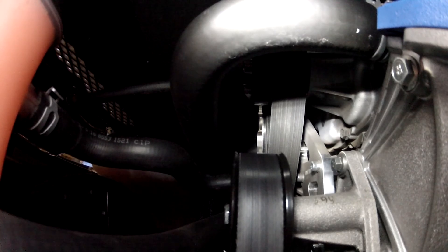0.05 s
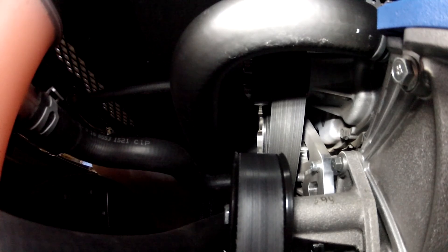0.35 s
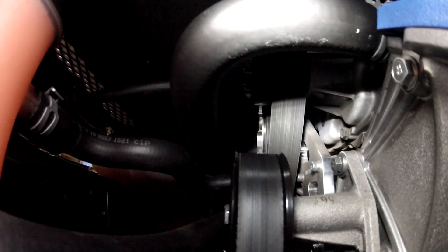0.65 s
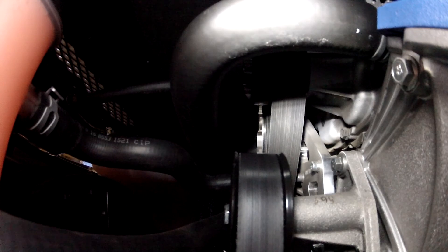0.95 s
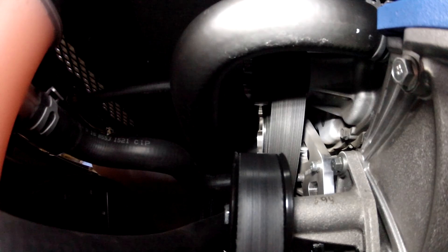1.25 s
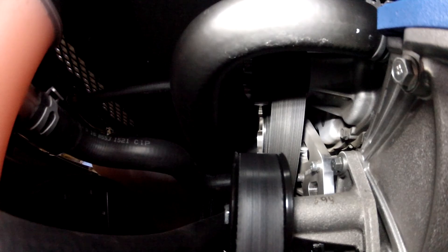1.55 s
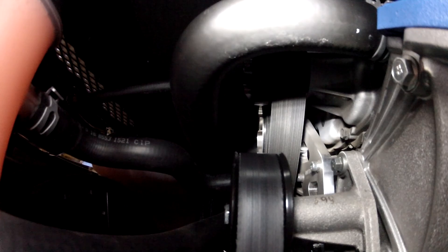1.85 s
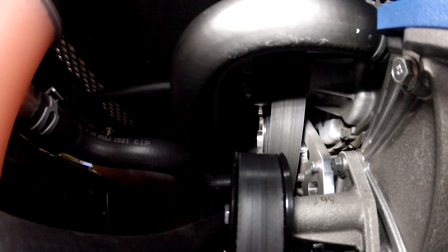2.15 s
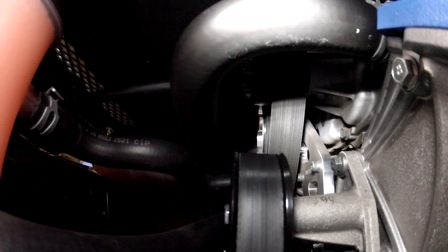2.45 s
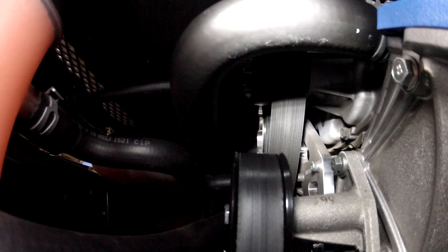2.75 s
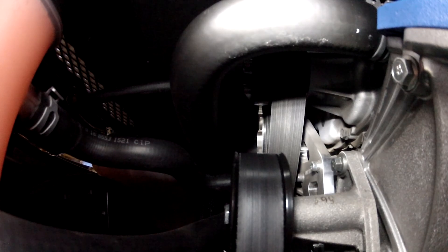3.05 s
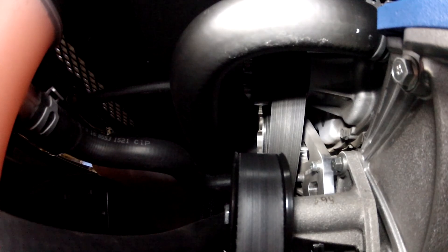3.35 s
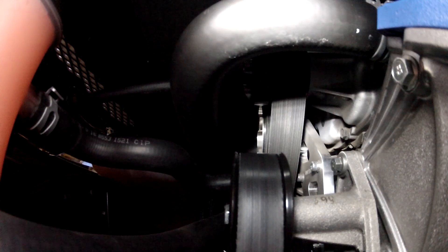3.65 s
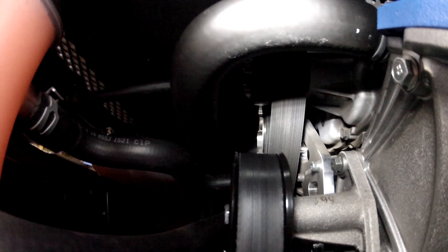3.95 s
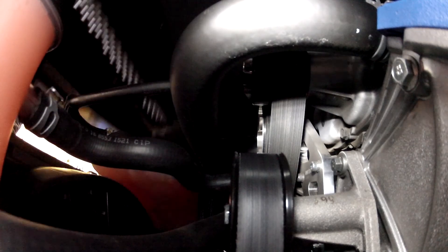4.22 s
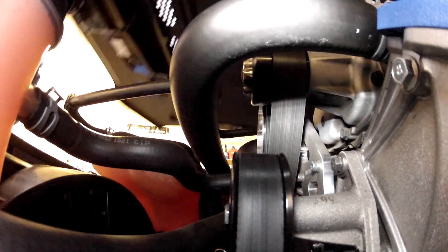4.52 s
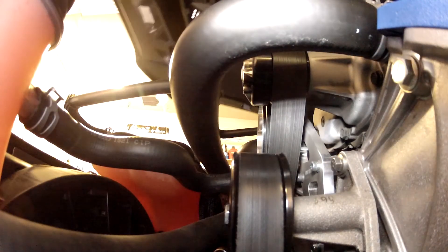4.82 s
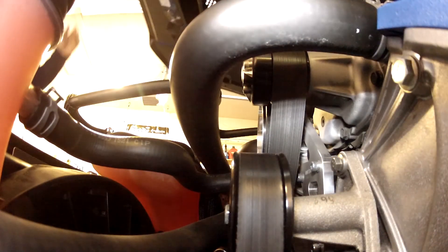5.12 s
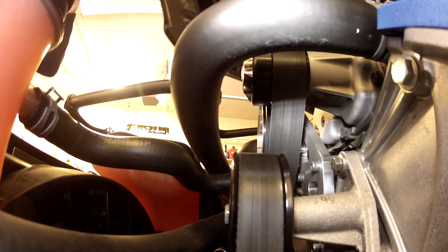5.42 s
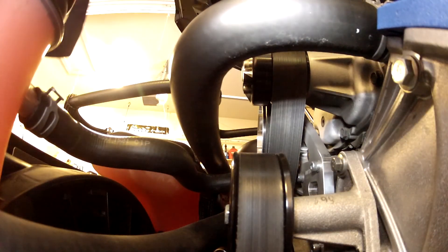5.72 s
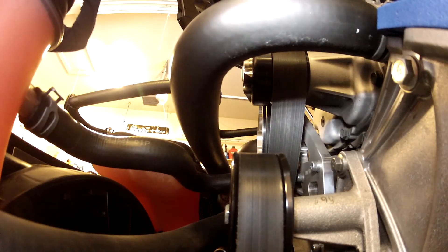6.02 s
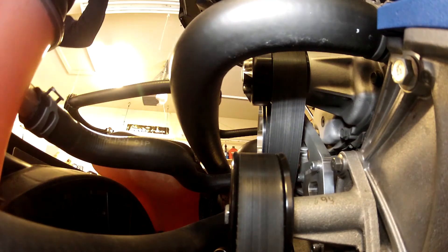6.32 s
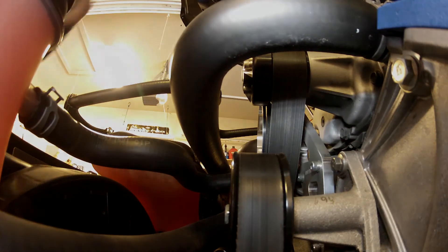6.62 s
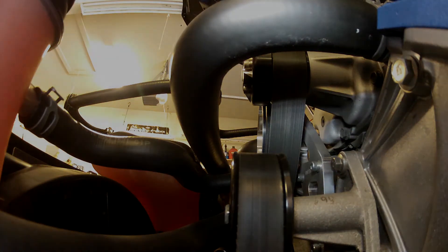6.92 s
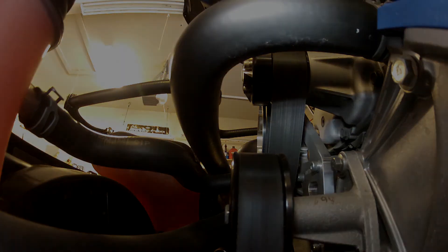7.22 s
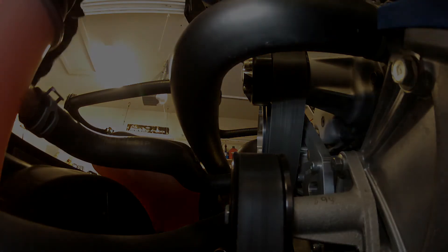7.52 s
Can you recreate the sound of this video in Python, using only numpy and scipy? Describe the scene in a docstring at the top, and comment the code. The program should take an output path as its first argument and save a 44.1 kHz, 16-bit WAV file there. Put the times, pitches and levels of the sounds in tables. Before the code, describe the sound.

A car door slams with a heavy, booming thump, heard from inside the engine bay in a garage. A cooling fan coasts down with a faint, falling whine as dull footsteps come round. The hood latch thuds free and the safety catch snaps loudly, ringing the metal. The hood lifts on faintly hissing struts, with a few knocks over low room rumble and hum.

```python
"""Inside a car's engine bay, in a garage: a door slams and a rotor, likely the cooling fan, coasts down.
Dull footsteps come round to the front, the latch thuds free and the safety catch snaps, ringing the hood.
The hood lifts on hissing gas struts, and the rush of the shut bay gives way to garage rumble and hum.
The loud blows overload a converter that holds each sample, which adds a fizz near 12 kHz."""
import sys
import numpy as np
from scipy import signal
from scipy.io import wavfile
from scipy.ndimage import uniform_filter1d

SR = 44100
rng = np.random.default_rng(int(sys.argv[2]) if len(sys.argv) > 2 else 0)


def int16_out(signal):
    """Quantize to a 16-bit WAV file."""
    q = np.round(np.clip(np.atleast_2d(signal).T, -1, 1) * 32767)
    wavfile.write(sys.argv[1], SR, q.astype(np.int16))


N = 342657
TIME = np.arange(N) / SR
AGE = TIME[:2 * SR]  # seconds since a hit

# The door landing and shuddering: start_s, level_db
DOOR_BLOWS = [(.046, 0), (.07, -.5), (.081, -2.5), (.124, -4.5), (.195, -17)]
# Tone of the door's blows and of its rubbing seal: freq_hz, level_db
DOOR_COLOUR = [(24, -27), (40, 0.5), (146, -3.5), (204, -9), (277, -4.5), (355, -13), (394, -19.5),
               (547, -14), (659, -27.5), (716, -23.5), (1100, -45), (1670, -57), (2840, -55), (5500, -73),
               (7150, -102), (12100, -120)]
SEAL_COLOUR = [(59, -39.5), (100, -12), (389, 1), (840, 0.5), (1020, -18.5), (1350, -33), (1930, -52.5),
               (2100, -31.5), (2960, -43), (5000, -43.5), (6500, -84), (11000, -120)]
# Ring of the car body, the hood and the latch: pitch_hz, level_db, t60_s
BODY_MODES = [(53.23, -19, 1.5), (75, -25, 1.6), (134.2, -20, 0.89), (276, -21.5, 0.65)]
HOOD_MODES = [(672, -4.5, .065), (430, -15, .09), (285, -17, .06), (1050, -12, .035), (1650, -27, .04),
              (135, -34, .4), (248, -30, .5), (323, -29, .6), (463, -36, .8), (506, -33, .55),
              (705, -35, .8), (1000, -46, 1.3), (1275, -55, 1.3), (1443, -60, 1.4), (1852, -57, 1.1),
              (2126, -52.5, 1.1), (2160, -55, 1.25), (2929, -49, .75), (2960, -57, .6)]
LATCH_MODES = [(32.2, -26, 0.32), (60, -25, .4), (170, -1, 0.07), (258.7, 0, 0.04), (288, -19.5, .12),
               (415.4, -28, 0.058), (470, -4, 0.065)]
# Tone of the catch's crack, the latch's thud and any hard contact: freq_hz, level_db
CATCH_COLOUR = [(35, -60), (60, -51), (139, -6.5), (208, -10), (238, 0), (422, 2), (619, -15.5), (681, -4),
                (873, -27), (1020, -24.5), (1330, -40), (2150, -18), (2360, -35.5), (2860, -30),
                (5800, -65.5), (7540, -78.5), (12800, -120)]
LATCH_COLOUR = [(15, -29), (25, -6), (61, -9), (87, -16.5), (108, -5), (138, -9.5), (172, 5.5), (215, -7.5),
                (521, -3.5), (569, -15.5), (830, -27), (1130, -47), (5000, -74.5), (6500, -99),
                (11000, -120)]
TICK_COLOUR = [(500, -19), (1000, 1.5), (1500, -8.5), (2300, -3.5), (3300, -6), (5500, -18)]
# Hands, latch and hinges knocking the hood: start_s, level_db, pitch_hz, t60_s, tick_db, rattle_db
HOOD_KNOCKS = [(3.072, -42.5, 894, 0.13, -12, 6.5), (3.357, -33.5, 488, 0.21, -16.5, -3.5),
               (3.863, -26.5, 608, .14, -18, 0), (4.164, -36, 559, 0.17, -38, -6),
               (5.481, -25.5, 386.7, 0.17, -50, -10), (5.712, -30.5, 35, 0.27, -23.5, 2),
               (5.724, -28, 622.6, 0.15, -15, -5), (5.737, -23, 326, 0.2, -42, -8),
               (7.345, -56, 700, .06, -6.5, -3), (7.64, -42.5, 617, 0.068, -7.5, -2),
               (7.7, -56, 610, .06, -6, -4)]
# Creaks of the hood: start_s, level_db
HOOD_CREAKS = [(3.27, -64), (3.56, -64.5), (6.925, -67)]
# Resonances of the bay that shape the rotor's whine: freq_hz, gain_db
BAY_RESONANCES = [(25, -22), (45, -10), (52, 1), (66, -10), (112, -4), (175, -10), (212, -12), (232, 1),
                  (248, 0), (272, -3), (295, -7), (326, -2), (365, -1), (395, -9), (450, -19), (700, -20),
                  (900, -34)]
# Footfalls: start_s, level_db, centre_hz, t60_s
FOOTFALLS = [(0.744, -39.5, 300, .26), (1.182, -31, 145, .086), (1.767, -36.5, 293, .2),
             (2.029, -33.5, 215, 0.062), (2.203, -31, 260, 0.14), (2.636, -40.5, 250, 0.15),
             (3.045, -34, 149, 0.074), (3.535, -36, 120, .22), (6.436, -45, 214, 0.12),
             (6.953, -40, 269, .32)]
# Tone of the struts' hiss: freq_hz, level_db
STRUT_COLOUR = [(300, -9.5), (550, 8), (750, 7), (1000, 0), (1400, -30), (2300, -7.5), (2950, 2),
                (3600, -2), (4300, -12.5), (5500, -23.5)]
# Tone of the shut bay's rush, its thin hiss and the open garage air: freq_hz, level_db
BAY_RUSH_COLOUR = [(15, -37.5), (25, -14), (70, 2), (118, -1), (151, -7.5), (244, -6), (293, -9),
                   (344, -7.5), (422, -24), (462, -15), (746, -12), (817, -24.5), (1290, -36),
                   (2730, -36.5), (5800, -43), (7540, -84), (12800, -120)]
BAY_HISS_COLOUR = [(2000, -35), (2550, -12), (2750, -2.5), (2950, -16), (3300, -18), (3550, -8.5),
                   (3900, -33)]
GARAGE_AIR_COLOUR = [(15, -50.5), (25, -19.5), (54, -5), (92, -7.5), (123, -4.5), (173, -10.5), (213, -9),
                     (239, -20), (286, -1), (328, -13), (484, -9), (681, -20.5), (1180, -37), (4120, -42.5),
                     (5800, -45.5), (7540, -86), (12800, -120)]
# Hum in the garage: pitch_hz, level_db
HUM_TONES = [(118.4, -60), (290.7, -65.5)]
# Reverb time of the garage: freq_hz, t60_s
GARAGE_DECAY = [(50, 0.86), (250, 0.57), (700, 0.66), (3000, 0.61), (5500, 0.51)]
# Where loud blows clip, left row then right: ceiling_amplitude
CLIP_CEILINGS = [
    [1],
    [.95],
]

LATCH_AT_S, CATCH_AT_S = 3.9365, 4.4238
LIFT_AT_S, LIFT_S = 4.1, 1.7
HOOD_OPENING = np.clip((TIME - LIFT_AT_S) / LIFT_S, 0, 1)  # 0 shut, 1 up
STRUT_ATTACK_S, STRUT_HOLD_S = .26, 1.02
START_TURNS_PER_S = 59


def door_slam(first_t60_s=.1, loosening=1.7, seal_swell_s=.041):
    """The seal rubs, the door lands, later shudders ring longer; the body booms and loose trim rattles."""
    lands = DOOR_BLOWS[0][0]
    blows = np.zeros(N)
    for start, db in DOOR_BLOWS:
        t60 = first_t60_s + loosening * (start - lands)
        blows += placed(start, gain_of(db) * rattle(DOOR_COLOUR, t60, rise=.00098))
    rub = envelope(lands - seal_swell_s, seal_swell_s, hold=0, t60=.052)
    seal = gain_of(-14.5) * rub * hiss(SEAL_COLOUR)
    trim = gain_of(-43) * rattle(TICK_COLOUR, t60=.55, rise=.0075)
    boom = ring(BODY_MODES, rise=.015)
    return garage_reverb(blows + seal, wet_db=-9, build_s=.044) + placed(lands, boom + trim)


def safety_catch(punch_hz=350, climb_hz_per_s=32000, punch_s=.0078):
    """The catch snaps back: a punch and a crack, the hood's ring, then the far walls answer."""
    # The punch kicks the sheet metal through a few heavy, quickening swings.
    swell = np.sin(np.pi * np.minimum(AGE / punch_s, 1)) ** 2
    punch = gain_of(3.5) * swell * np.sin(2 * np.pi * (punch_hz + climb_hz_per_s * AGE / 2) * AGE)
    crack = gain_of(-8.5) * rattle(CATCH_COLOUR, t60=.039, rise=.0025)
    tick = gain_of(-22.5) * rattle(TICK_COLOUR, t60=.087, rise=.0021)
    dull = hump(452, below=-8, above=-11)
    clunk = gain_of(-10.5) * rattle(dull, t60=.19, rise=.0042)
    snap = placed(CATCH_AT_S, crack + tick + clunk)
    walls = placed(CATCH_AT_S + .074, gain_of(-25) * rattle(dull, t60=.41, rise=.061))
    hood = placed(CATCH_AT_S, punch + ring(HOOD_MODES, rise=.0014))
    return garage_reverb(snap + walls, wet_db=-18.5, build_s=.12) + hood


def latch_release():
    """The hood jumps on its latch spring with a soft, low thud."""
    thud = ring(LATCH_MODES, rise=.0053) + gain_of(-17.5) * rattle(LATCH_COLOUR, t60=.22, rise=.0013)
    push = gain_of(-27.5) * rattle(hump(700, below=-14, above=-6.5), t60=.05, rise=.0018)
    return garage_reverb(placed(LATCH_AT_S, thud + push), wet_db=-23.5, build_s=.04)


def hood_handling(scrape_share=.61, creak_hz=2110):
    """Each knock rings a panel, rattles its neighbours and scrapes where metal meets; the hood creaks."""
    out = np.zeros(N)
    for start, db, hz, t60, tick_db, rattle_db in HOOD_KNOCKS:
        panel = ring([(hz, -3, t60)], rise=.0019)
        neighbours = gain_of(rattle_db) * rattle(hump(hz, below=-4, above=-7.5), t60, rise=.00043)
        scrape = gain_of(tick_db) * rattle(TICK_COLOUR, scrape_share * t60, rise=.003)
        out += placed(start, gain_of(db) * (panel + neighbours + scrape))
    creak_colour = [(creak_hz * .6, -28), (creak_hz, 0), (creak_hz * 1.2, -28)]
    for start, db in HOOD_CREAKS:
        out += placed(start, gain_of(db) * rattle(creak_colour, t60=.24, rise=.03))
    return garage_reverb(out, wet_db=-12.5, build_s=.046)


def rotor_speed(drag_s=4.92, friction_turns_per_s2=3.05):
    """Turns per second of a rotor coasting against air drag and bearing friction."""
    friction = friction_turns_per_s2 * drag_s
    return np.maximum((START_TURNS_PER_S + friction) * np.exp(-TIME / drag_s) - friction, 1)


def rotor_whine(blades=6, blade_boost_db=9, stall_turns_per_s=35):
    """Shaft harmonics slide down through the bay's resonances and die away below the stall speed."""
    speed = rotor_speed()
    turns = np.cumsum(speed) / SR
    level_db = -52 - 10 * np.log10(1 + (stall_turns_per_s / speed) ** 8)
    waver_times = np.arange(0, 8, .15)  # each harmonic swells and fades a little on its own
    out = np.zeros(N)
    for order in range(1, 24):
        waver_db = 2.5 * np.interp(TIME, waver_times, rng.standard_normal(len(waver_times)))
        order_db = curve_at(BAY_RESONANCES, order * speed) + blade_boost_db * (order % blades == 0)
        tone = np.cos(2 * np.pi * (order * turns + rng.random()))
        out += gain_of(level_db + order_db + waver_db) * tone
    return out


def footsteps(sole_lag_s=.038):
    """Dull footfalls out in the room, heel then sole, with a little grit under the shoe."""
    out = np.zeros(N)
    for start, db, hz, t60 in FOOTFALLS:
        heel = rattle(hump(hz, below=-13, above=-9), t60, rise=.0014)
        grit = gain_of(-31) * rattle(TICK_COLOUR, t60, rise=.018)
        sole = gain_of(-10) * rattle(hump(380, below=-10, above=-13), t60=.085, rise=.002)
        out += gain_of(db) * (placed(start, heel + grit) + placed(start + sole_lag_s, sole))
    return garage_reverb(out, wet_db=-8.5, build_s=.03)


def gas_struts():
    """The struts hiss as they extend, juddering because the rods slide a little unevenly."""
    judder_db = 1.8 * hiss([(1, 0), (6, -2), (30, -30), (120, -100)])
    travel = envelope(LIFT_AT_S, STRUT_ATTACK_S, STRUT_HOLD_S, t60=.7)
    return gain_of(-63.5 + judder_db) * travel * hiss(STRUT_COLOUR)


def bay_rush(db_per_turn_per_s=.11, escape_db=-11):
    """Rushing air and a thin, fluttering hiss sink as the rotor slows and the hood opens."""
    speed_lost = START_TURNS_PER_S - rotor_speed()
    level_db = -44 - db_per_turn_per_s * speed_lost + escape_db * HOOD_OPENING
    flutter_db = 2.5 * hiss([(4, 0), (25, -3), (90, -40), (300, -100)])
    rush = hiss(BAY_RUSH_COLOUR)
    thin_hiss = gain_of(-25 + flutter_db) * hiss(BAY_HISS_COLOUR)
    return gain_of(level_db) * (rush + thin_hiss)


def garage_air(shield_db=-2):
    """Room rumble, slightly shielded by the shut hood, swells into a low rush as the hood swings up."""
    room = gain_of(-52.5 + shield_db * (1 - HOOD_OPENING))
    swing = gain_of(-47.5) * envelope(LIFT_AT_S, STRUT_ATTACK_S, STRUT_HOLD_S, t60=3.8)
    return np.hypot(room, swing) * hiss(GARAGE_AIR_COLOUR)


def garage_hum():
    """Two faint, low tones, each drifting in phase."""
    out = np.zeros(N)
    for hz, db in HUM_TONES:
        drift = hiss([(1, 2.5), (4, .5), (20, -63), (80, -100)])
        out += gain_of(db) * np.sqrt(2) * np.sin(2 * np.pi * hz * TIME + drift)
    return out


def garage_reverb(x, wet_db, build_s):
    """Adds the room's tail, which builds up as the sound reaches the walls."""
    hz, t, noise = signal.stft(rng.standard_normal(len(AGE)), SR, nperseg=512)
    decay = np.exp(-np.log(1000) * t / curve_at(GARAGE_DECAY, hz)[:, None])
    tail = signal.istft(noise * decay, SR, nperseg=512)[1][:len(AGE)]
    tail *= 1 - np.exp(-(AGE / build_s) ** 2)
    return x + gain_of(wet_db) * signal.fftconvolve(x, tail / np.linalg.norm(tail))[:N]


def rattle(spectrum, t60, rise):
    """A blow scattered by many close panels; its loudest 10 ms have the power of a unit sine."""
    reflections = rng.choice([-1., 1.], len(AGE)) * fade(t60) * (1 - np.exp(-AGE / rise))
    blow = coloured(reflections, spectrum)
    peak_power = uniform_filter1d(blow ** 2, size=441).max()
    return blow / np.sqrt(2 * peak_power + 1e-20)


def ring(modes, rise):
    """Decaying modes that swell over the contact time."""
    tones = sum(gain_of(db) * fade(t60) * np.sin(2 * np.pi * hz * AGE) for hz, db, t60 in modes)
    return tones * (1 - np.exp(-AGE / rise))


def hiss(spectrum):
    """Steady coloured noise of rms 1."""
    noise = coloured(rng.standard_normal(N), spectrum)
    return noise / np.sqrt(np.mean(noise ** 2) + 1e-20)


def hump(centre_hz, below, above, shell_hz=820):
    """A broad resonance with slopes in dB per octave; the bay's shell cuts the top end."""
    hz = np.geomspace(20, 6000, num=50)
    octaves = np.log2(hz / centre_hz)
    shell_db = -10 * np.log10(1 + (hz / shell_hz) ** 12)
    return np.transpose([hz, np.where(octaves < 0, -below, above) * octaves + shell_db])


def coloured(x, spectrum, size=8192):
    """Minimum-phase EQ along a curve of freq_hz, level_db."""
    curve_db = curve_at(spectrum, abs(np.fft.fftfreq(size, 1 / SR)))
    log_gain = np.log(gain_of(np.maximum(curve_db, -100)))
    taps = np.fft.ifft(np.exp(np.conj(signal.hilbert(log_gain)))).real[:size // 2]
    return signal.fftconvolve(x, taps)[:len(x)]


def curve_at(points, hz):
    """Reads a curve on a log-frequency axis."""
    freqs, values = np.transpose(points)
    return np.interp(np.log(hz + 1), np.log(freqs + 1), values)


def envelope(start, attack, hold, t60):
    """Swells from start, holds, then dies away."""
    age = TIME - start
    release = np.exp(-np.log(1000) * np.maximum(age - attack - hold, 0) / t60)
    return np.clip(age / attack, 0, 1) ** 2 * release


def fade(t60):
    """Falls 60 dB in t60 seconds."""
    return np.exp(-np.log(1000) * AGE / t60)


def placed(start_s, sound):
    """A full-length track with the sound cued at start_s."""
    return np.pad(sound, (max(round(start_s * SR), 0), N))[:N]


def gain_of(db):
    """Decibels to amplitude."""
    return 10 ** (np.asarray(db) / 20)


def scene():
    """Everything sits in the centre; only a faint hiss differs between left and right."""
    middle = door_slam() + rotor_whine() + footsteps() + hood_handling() + latch_release()
    middle += safety_catch() + bay_rush() + garage_air() + garage_hum() + gas_struts()
    side = gain_of(-75.5) * hiss([(50, 2), (500, -6), (1500, -2), (5000, -1.5)])
    return np.array([middle + side, middle - side])


def record(dry, hold_hz=12000, top_hz=15500):
    """Loud blows clip, the converter holds each sample as a fizzy step, and a low-pass trims the top."""
    ceiling = np.array(CLIP_CEILINGS)
    clipped = np.clip(signal.resample_poly(dry, hold_hz, SR, axis=1), -ceiling, ceiling)
    smoothed = signal.oaconvolve(clipped, signal.firwin(63, 5700, fs=hold_hz)[None], "same")
    held = signal.resample_poly(np.repeat(smoothed, 8, axis=1), SR, 8 * hold_hz, axis=1)[:, :N]
    low_pass = signal.firwin(255, top_hz, window=("kaiser", 8), fs=SR)
    return signal.oaconvolve(np.clip(held, -1, 1), low_pass[None], "same")


dry = scene()
out = record(dry)
int16_out(out)
```